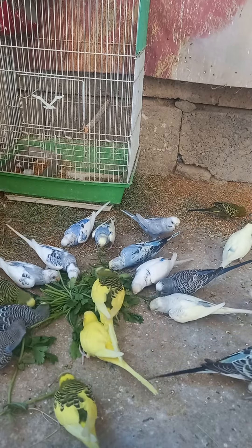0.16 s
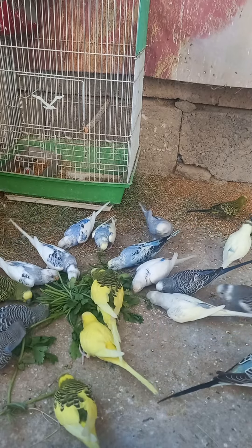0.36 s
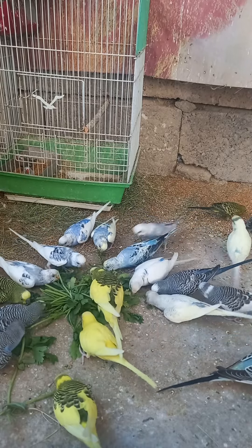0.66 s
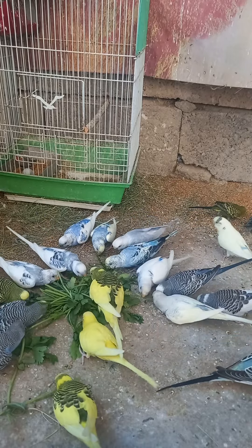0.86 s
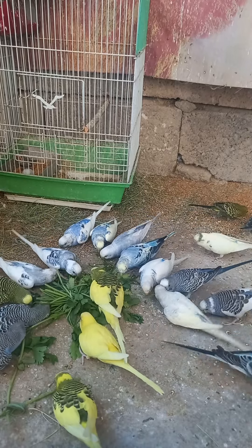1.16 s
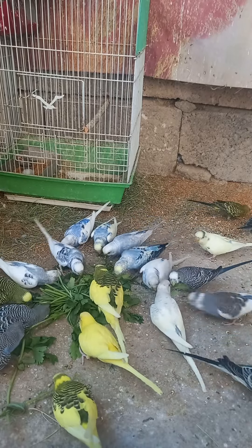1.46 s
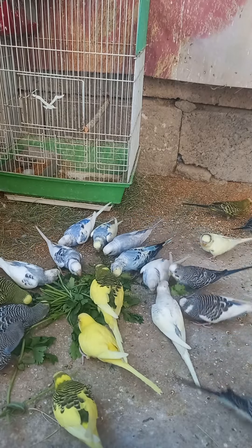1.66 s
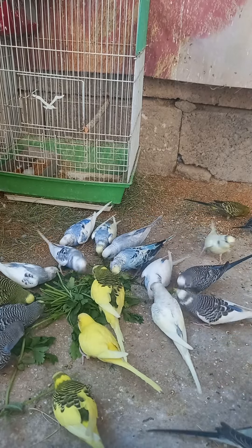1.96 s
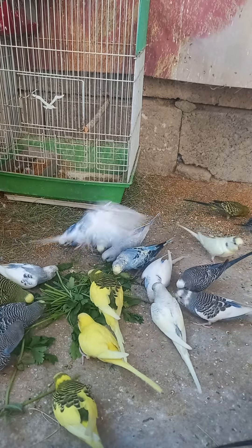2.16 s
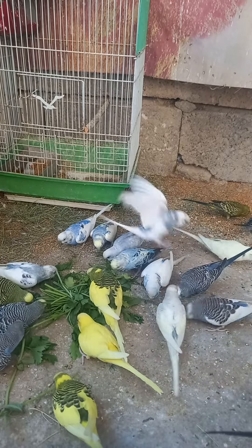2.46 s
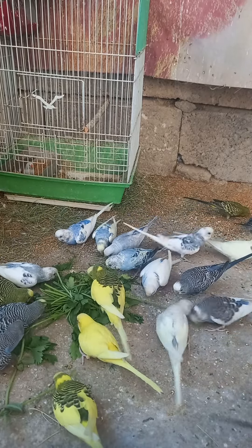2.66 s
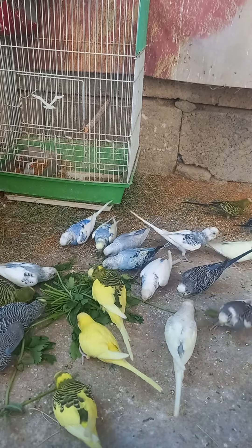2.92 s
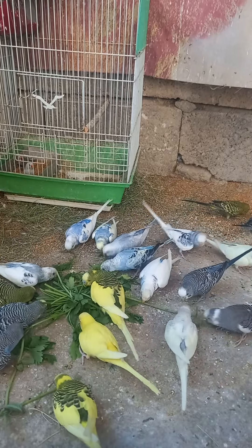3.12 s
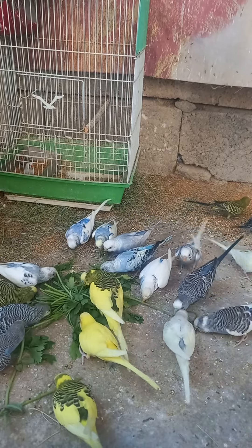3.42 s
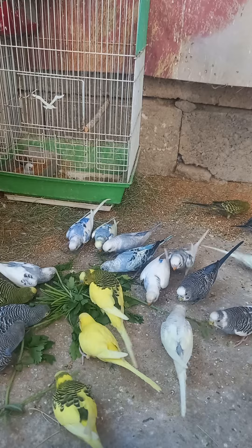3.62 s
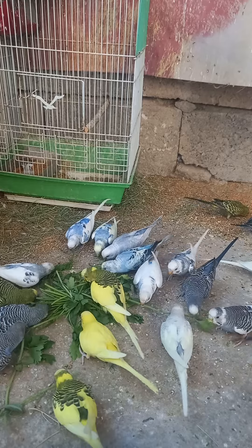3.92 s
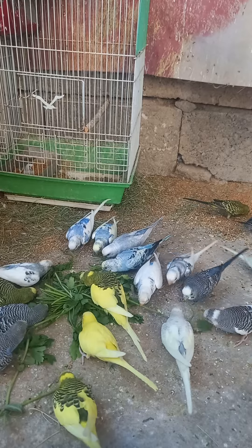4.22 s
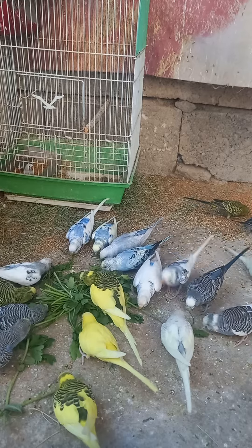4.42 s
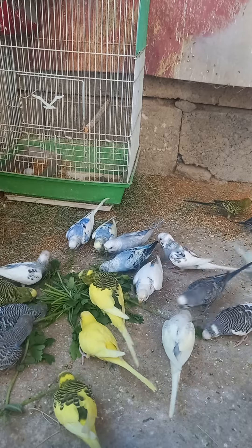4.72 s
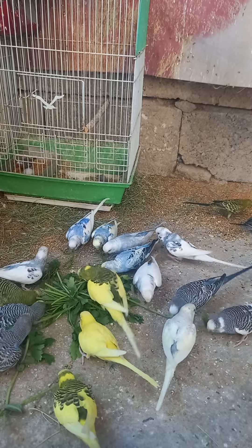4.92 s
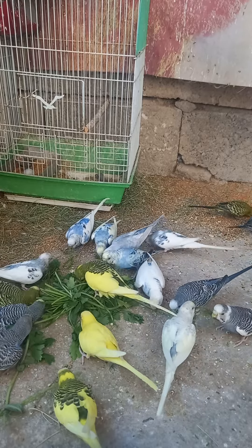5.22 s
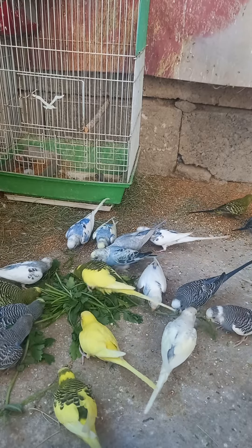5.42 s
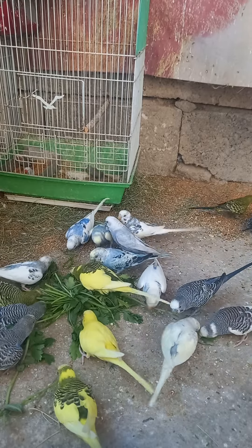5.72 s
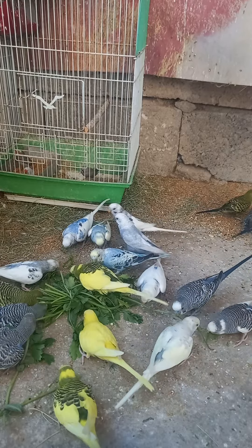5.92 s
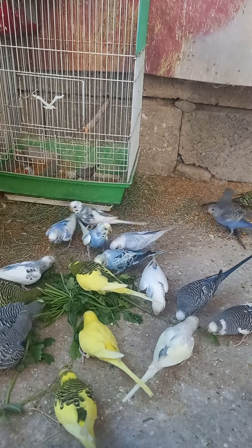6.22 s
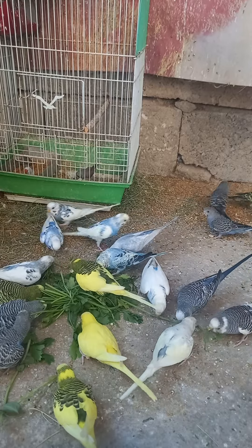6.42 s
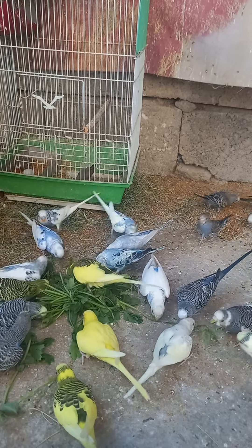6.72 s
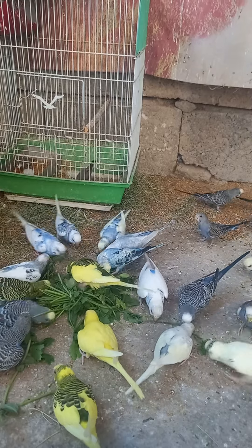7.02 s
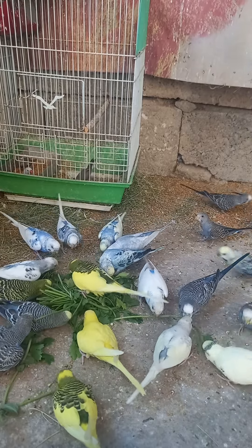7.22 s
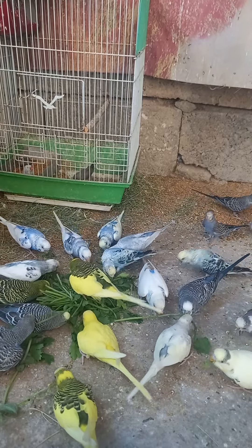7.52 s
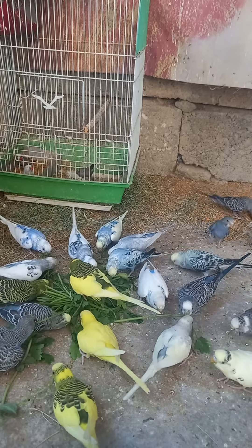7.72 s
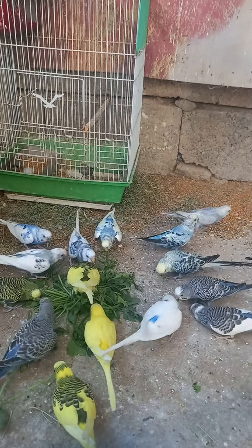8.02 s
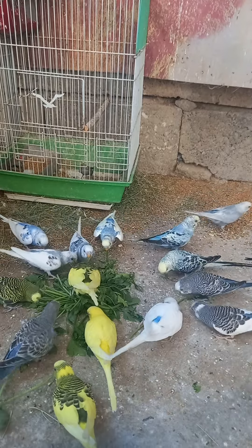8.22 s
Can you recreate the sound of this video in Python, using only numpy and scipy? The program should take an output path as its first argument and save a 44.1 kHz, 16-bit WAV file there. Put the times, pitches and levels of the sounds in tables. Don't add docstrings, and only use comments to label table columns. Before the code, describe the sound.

A budgie flock feeds outdoors, repeating fast scratchy warbles and sharp descending calls amid faint nibbling, wing rustles and a distant fan's hum.

```python
import sys
import numpy as np
from scipy import signal
from scipy.fft import rfft, irfft, next_fast_len
from scipy.io import wavfile

SR = 44100
rng = np.random.default_rng(int(sys.argv[2]) if len(sys.argv) > 2 else 0)


def put_to_file(sound):
    columns = np.atleast_2d(sound).T
    safe = np.clip(columns, -1, 1)
    whole_steps = np.round(safe * 32767)
    wavfile.write(sys.argv[1], SR, whole_steps.astype(np.int16))


def rack_gain(trim_db):
    fader = np.asarray(trim_db, float)
    return 10 ** (fader / 20)


N = 369116

WARBLE_AIR_DB = -27


def at_hz(points, hz):
    table = np.array(points)
    return np.interp(np.log(np.maximum(hz, 1)), np.log(table[:, 0]), table[:, 1])


def rms_one(x):
    return x / np.sqrt(np.mean(x ** 2) + 1e-20)


def wander(size, rate_hz):
    r = np.exp(-2 * np.pi * rate_hz / SR)
    drift = signal.lfilter([1], [1, -2 * r, r * r], rng.standard_normal(size))
    return rms_one(drift[size // 2:])


def bandpass(x, order, low_hz, high_hz):
    return signal.sosfilt(signal.butter(order, [low_hz, high_hz], "band", fs=SR, output="sos"), x)


def add(out, x, s, pan_db):
    i = round(s * SR)
    sides = rack_gain(np.array([[pan_db / 2], [-pan_db / 2]]))
    out[:, i:i + len(x)] += (x * sides)[:, :N - i]


def note(hz_start, hz_mid, hz_end, length, flutter, overtone_db, air_db):
    # pitch in Hz, boost in dB.
    throat = [(2200, -1), (3000, 1.5), (3800, 4), (4600, -1)]
    # pitch in Hz, boost in dB.
    overtone_colour = [(4400, -10), (5200, 12), (6100, -5), (6900, -8.5), (7700, -0.5), (11000, -18),
                       (13200, 4), (14600, 2)]
    u = np.arange(round(length * SR)) / (length * SR)
    wobble, beat, depth, grit = (wander(6000, rate)[:len(u)] for rate in (302.0, 59.5, 120., 1020.0))

    hz = hz_start * (1 - u) * (1 - 2 * u) + 4 * hz_mid * u * (1 - u) + hz_end * u * (2 * u - 1)
    hz = hz * (1 + .023 * flutter * wobble)
    turn = 2 * np.pi * np.cumsum(hz) / SR
    tone = rack_gain(at_hz(throat, hz)) * np.sin(turn)
    for k in range(2, 7):
        fall_db = 5.0 * (k - 2.5) + 3.5 * flutter * (k - 2)
        level = rack_gain(overtone_db - fall_db + at_hz(overtone_colour, k * hz))
        audible = k * hz < .45 * SR
        tone += level * audible * np.sin(k * turn + k * k)

    rasp = bandpass(rng.standard_normal(3000), 3, 3000, 9300)[:len(u)]
    air = bandpass(rng.standard_normal(3000), 3, 13700, 15500)[:len(u)]
    tone += flutter * rack_gain(-20.0) * rasp + rack_gain(air_db) * air

    pulses = np.cos(2 * np.pi * np.cumsum(300 * (1 + 0.297 * beat)) / SR + 6 * rng.random())
    unsteady = 1 + flutter * (.6 * pulses + .35 * depth + .38 * grit)
    edge = np.clip(np.minimum(u / 0.21, (1 - u) / 0.14), 0, 1)
    return np.sin(np.pi / 2 * edge) ** 2 * tone * unsteady


def birds(calls, pattern, air_db):
    out = np.zeros((2, N))
    for call in calls:
        for (s, *glide, db, pan_db), shape in zip(call, pattern[-len(call):]):
            sound = note(*glide, *shape, air_db - .35 * (db + 15.5))
            add(out, rack_gain(db - 2.5) * sound, s - .002, pan_db)
    return out


def sung(song, calls):
    slip_ratio, slip_db = .01, 1.0
    out = []
    for s, slow, pitch, gain_db, pan_db in calls:
        slips = rng.standard_normal((len(song), 2))
        call = []
        for (delay, *glide, db), (a, b) in zip(song, slips):
            moved = pitch * (1 + slip_ratio * a) * np.array(glide)
            call.append((s + slow * delay, *moved, db + gain_db + slip_db * b, pan_db))
        out.append(call)
    return out


def warbling_bird():
    # delay in seconds, start, middle and end pitch in Hz, level in dB.
    song = [(0, 4440, 4930, 5300, -26), (.018, 3010, 3080, 3330, -24), (.031, 4300, 4290, 4400, -26),
            (.043, 3330, 3680, 3950, -26.5), (.066, 3000, 2500, 2450, -33), (.089, 2400, 3420, 3920, -25),
            (.125, 4270, 4400, 3670, -31), (.153, 3070, 3270, 3900, -24), (.188, 2170, 2290, 2490, -36),
            (.207, 2420, 3140, 3780, -27), (.253, 4260, 4140, 3590, -32.5)]
    # length in seconds, flutter from 0 to about 1, overtones in dB.
    voice = [(0.0224, 0.9, -18), (0.016, 0.45, -7.5), (0.016, 0.85, -19), (0.0341, 0.66, -6),
             (0.028, 0, -9), (.039, 0.39, -12.5), (.038, 0.55, -15.5), (0.034, 0.7, -15.5),
             (0.0258, 0, -1.5), (.037, 0.75, -14), (0.0296, 0.82, -17)]
    # start in seconds, slowness ratio, pitch ratio, gain in dB, left-right in dB.
    whole = [
        (0.068, 1.01, 1.01, 1, -2),
        (0.555, 1.016, 1.023, 1.5, -3),
        (1.126, .99, 0.98, 1.5, -2),
        (1.624, 1.007, 1, 0.5, -1.5),
        (2.153, .99, 0.97, -1, -3),
        (2.892, 1.045, 1, -1, -2.5),
        (3.635, .99, 1.01, -3, -3),
        (4.251, 0.97, 1.024, -2.5, -3.5),
        (5.924, 0.93, 0.99, -7.5, -4),
    ]
    # start in seconds, slowness ratio, pitch ratio, gain in dB, left-right in dB.
    short = [
        (7.432, 1.01, 1.01, -0.5, -4),
        (8.026, .99, .99, -1, -4.5),
    ]
    calls = sung(song, whole) + sung(song[3:], short)
    return birds(calls[::2], voice, WARBLE_AIR_DB), birds(calls[1::2], voice, WARBLE_AIR_DB)


def falling_bird():
    # delay in seconds, start, middle and end pitch in Hz, level in dB.
    song = [
        (0, 5700, 4760, 4310, -30),
        (.04, 3842, 3755, 3275, -13.5),
        (.066, 3130, 3034, 3020, -17),
        (.092, 2406, 2300, 2750, -27.5),
        (.12, 2650, 3130, 3574, -23),
        (.124, 2126, 2053, 1970, -36),
    ]
    # length in seconds, flutter from 0 to about 1, overtones in dB.
    voice = [
        (0.022, 1.06, -21),
        (0.028, 0.19, -21.5),
        (0.027, 0.17, -23.5),
        (.034, .75, -19),
        (.044, 1.12, -31),
        (.042, .95, -22),
    ]
    # start in seconds, slowness ratio, pitch ratio, gain in dB, left-right in dB.
    calls = [
        (0.782, 0.97, 0.95, -9, -1),
        (0.937, 1.09, 0.89, -5.5, -1.5),
        (3.176, 1.05, .99, 1.5, 0),
        (4.866, .93, 1, 1.5, -1.5),
        (6.079, .97, 0.95, -12.5, -2),
        (6.453, 1.01, .92, -4.5, 1.5),
        (6.534, 1.05, 0.97, 1.5, 0),
        (7.407, 0.96, 0.99, 1.5, -2.5),
    ]
    return birds(sung(song, calls), voice, -12.5)


def stray_birds():
    # start in seconds, start and end pitch in Hz, level in dB, left-right in dB.
    single_notes = [
        (0.896, 3610, 2890, -28.5, -3),
        (0.962, 2910, 3510, -23.5, 3),
        (0.927, 3260, 3267, -22, 1),
        (1.082, 4070, 3390, -25.5, -1),
        (1.12, 3740, 3230, -21.5, -2),
        (1.183, 2870, 2700, -23, -4),
        (4.236, 5040, 5050, -27.5, 2),
        (8.256, 2240, 2500, -36, -3),
    ]
    # length in seconds, flutter from 0 to about 1, overtones in dB.
    voice = (.027, .6, -26)
    calls = []
    for s, start, end, db, pan_db in single_notes:
        calls.append([(s, start, (start + end) / 2, end, db, pan_db)])
    return birds(calls, [voice], WARBLE_AIR_DB)


def ticks():
    # start in seconds, peak in dB, share of duller sound in dB.
    cracks = [(0.427, -44, -8), (0.852, -31, -13), (2.065, -55, -8), (2.521, -29.5, -13),
              (2.8629, -37, -11), (3.433, -38, -14), (3.5379, -39, -15), (3.6007, -47, -8),
              (3.9125, -40, -14), (4.0322, -43, -12), (4.0834, -57, -8), (4.1046, -40, -7),
              (4.1744, -36.5, -20), (4.2168, -33.5, -4), (4.2255, -37, -8), (4.597, -39, -6),
              (4.6912, -42, -4), (5.1542, -50, 2), (5.1853, -35, -4), (5.3921, -39, -10), (5.47, -37, -8),
              (6.3275, -45, -5), (6.98, -35.5, -14), (7.0993, -40, -11), (7.2809, -37, -8),
              (7.8134, -34, -14), (7.9904, -38, -18)]
    out, t = np.zeros((2, N)), np.arange(1000) / SR
    fade = np.exp(-t / 0.0015) + rack_gain(-11.5) * np.exp(-t / 0.018)
    for s, db, dull_db in cracks:
        snap = rng.standard_normal(len(t)) * fade
        bright = bandpass(snap, 2, 9900, 22000)
        dull = bandpass(snap, 2, 2500, 14500)
        add(out, rack_gain(db + 4.0) * (bright + rack_gain(dull_db) * dull), s, -2)
    return out


def rustles():
    # start in seconds, length in seconds, level in dB, centre pitch in Hz.
    brushes = [(0.94, 0.028, -43, 5000), (3.176, .022, -43, 5800), (6.53, .022, -41, 5800),
               (1.15, 0.034, -39.5, 7500), (1.354, 0.031, -31, 6157), (1.469, 0.021, -45.5, 5700),
               (1.533, 0.017, -43, 4400), (4.1, 0.011, -46, 4000), (4.226, 0.039, -42.5, 6960),
               (4.309, 0.054, -37, 5600), (4.9, 0.042, -37.5, 5400), (4.865, 0.032, -37, 6500),
               (4.947, 0.044, -30, 5400), (8.065, 0.039, -48, 7500), (7.455, .08, -42, 7450),
               (6.686, 0.045, -46, 16600), (4.95, .05, -47, 13000), (2.474, 0.032, -55, 12000),
               (7.1, 0.034, -51, 4300), (7.5, .08, -33, 4800), (7.252, 0.023, -37, 3167),
               (7.331, 0.031, -41, 2700)]
    spread = 1.3
    out = np.zeros((2, N))
    for s, length, db, hz in brushes:
        grain = rng.standard_normal(3000) * rack_gain(6.6 * wander(6000, 500.))
        brush = bandpass(grain[:round(length * SR)], 2, hz / spread, min(hz * spread, .4 * SR))
        add(out, rack_gain(db) * rms_one(brush) * np.hanning(len(brush)) ** .5, s, 0)
    return out


def crumbs():
    happens = rng.random((2, N)) < 160 / SR
    clicks = happens * rack_gain(7.2 * np.minimum(rng.exponential(1, (2, N)), 4))
    snaps = signal.lfilter([1], [1, -.97], clicks, axis=1) * rng.standard_normal((2, N))
    return rack_gain(-62.0) * rms_one(bandpass(snaps, 2, 10000, 16000))


def yard_echo(x, wet_db):
    t = np.arange(8000) / SR
    fade = rack_gain(-26) * np.exp(-t / .009) + rack_gain(-38.5) * np.exp(-t / .045)
    spray = rng.standard_normal((2, len(t))) * (t > .001) * fade
    spray = signal.sosfilt(signal.butter(1, 7000, fs=SR, output="sos"), spray)
    return x + rack_gain(wet_db) * signal.fftconvolve(x, spray, axes=1)[:, :N]


def background():
    # pitch in Hz, level in dB per Hz.
    yard = [(30, -41), (45, -9), (122, -8), (217, -9), (455, -14), (880, -13), (1660, -22.5), (2150, -22.5),
            (2600, -27), (3400, -27), (4500, -33.5), (6000, -35), (10000, -40), (14000, -40.5),
            (16000, -31)]
    # centre in Hz, width in Hz, level in dB.
    hum = [(65.2, 23, -39.5), (117.8, 22.4, -42.5), (222, 32, -46), (464, 35, -45.5), (744, 11, -54),
           (2109, 110, -50)]
    # pitch in Hz, likeness from 0 to 1.
    likeness = [(60, 1), (130, 0.85), (290, 0.72), (640, 0.26), (1400, 0.043), (3000, 0.73), (8000, 0.022)]
    # pitch in Hz, left-right in dB.
    balance = [(60, 2.5), (110, -1.5), (250, 6.5), (700, 0), (1290, -2), (8000, -.5)]
    # pitch in Hz, how early the right is in radians.
    hum_turn = [(60, 0.0099), (520, 1.65), (780, 1.23), (1290, 0.39)]
    size = next_fast_len(N)
    hz = np.arange(size // 2 + 1) * SR / size
    colour = rack_gain(at_hz(yard, hz))
    colour *= rack_gain(-34.5 - 3.0) / np.sqrt(np.mean(colour ** 2))
    power = colour ** 2
    for centre, width, db in hum:
        peak = rack_gain(db) ** 2 * SR / (np.pi * width)
        power += peak / (1 + (2 * (hz - centre) / width) ** 4)

    mid, side = rfft(rng.standard_normal((2, size))) * np.sqrt(power / 2) * (hz > 28)
    alike = np.clip(at_hz(likeness, hz), 0, 1)
    mid, side = np.sqrt(1 + alike) * mid, np.sqrt(1 - alike) * side
    tilt = rack_gain(at_hz(balance, hz) / 2)
    left = (mid + side) * tilt
    right = (mid - side) / tilt * np.exp(1j * at_hz(hum_turn, hz))
    swell = rack_gain(.6 * wander(2 * N, 2.))
    return swell * irfft([left, right], size)[:, :N]


def scene():
    echo_db = [0, 0, -5, 1, 0]
    near = (*warbling_bird(), falling_bird(), stray_birds(), ticks() + rustles())
    placed = sum(yard_echo(x, db) for x, db in zip(near, echo_db))
    return placed + crumbs() + background()


def band_limit(x):
    return signal.sosfilt(signal.butter(12, 16990, fs=SR, output="sos"), x)


def record(dry):
    late = np.array([dry[0], np.roll(dry[1], 20)])
    low_pass = signal.cheby2(14, 70, 15400 * 1.076, fs=SR, output="sos")
    return band_limit(signal.sosfilt(low_pass, late))


dry = scene()
out = record(dry)
put_to_file(out)
```